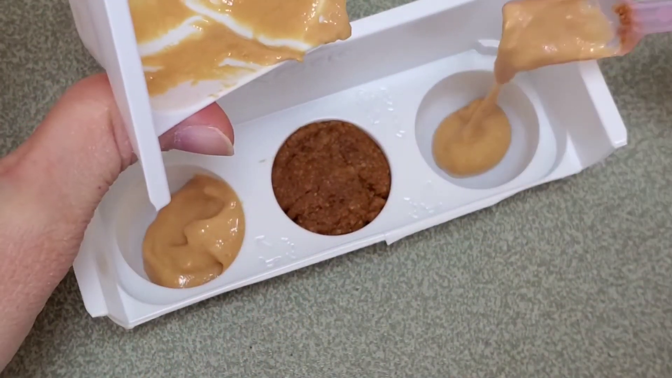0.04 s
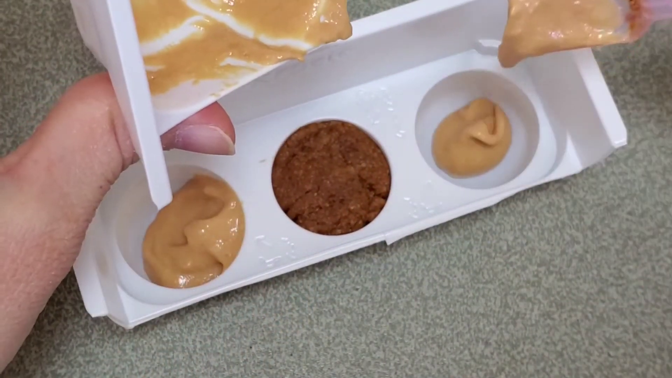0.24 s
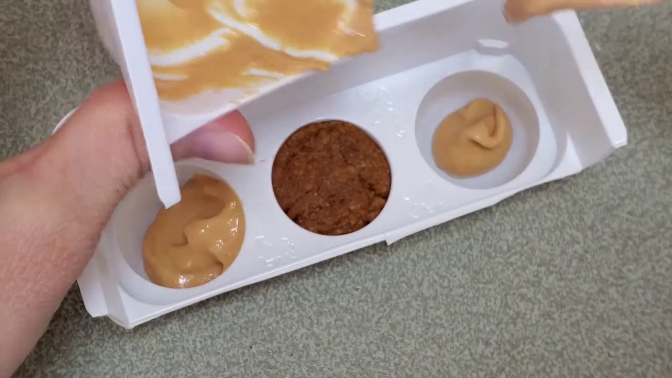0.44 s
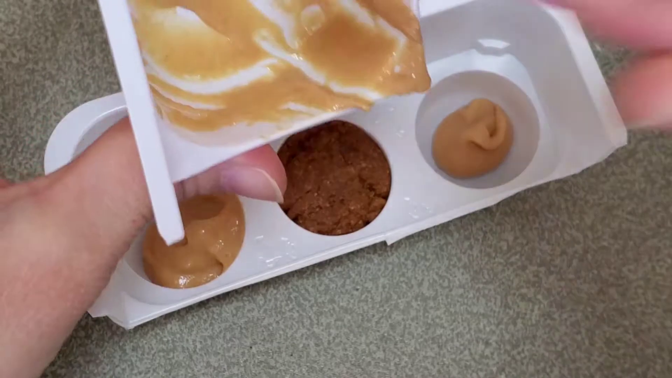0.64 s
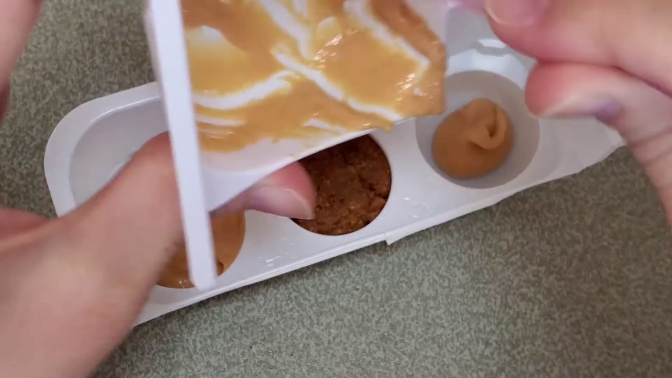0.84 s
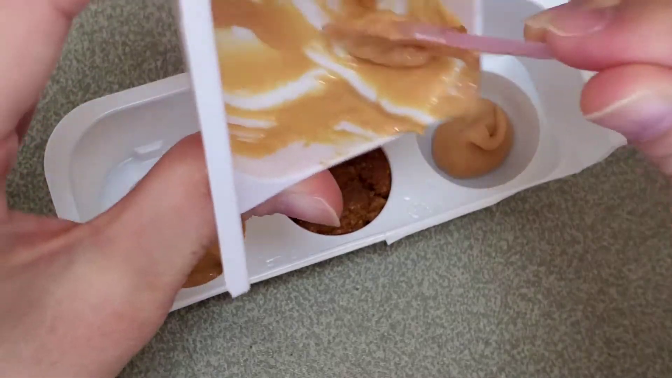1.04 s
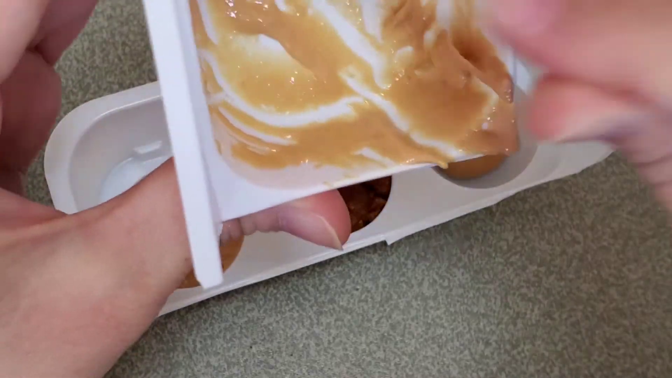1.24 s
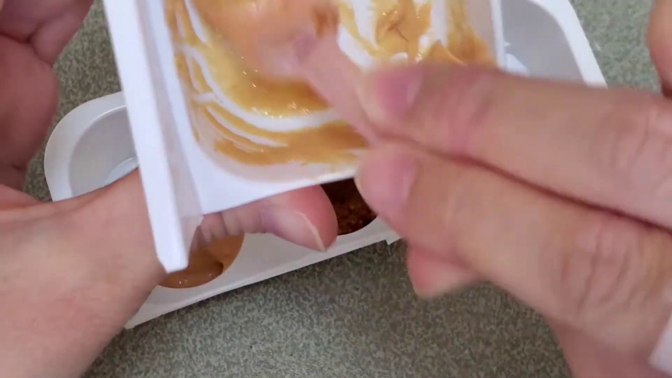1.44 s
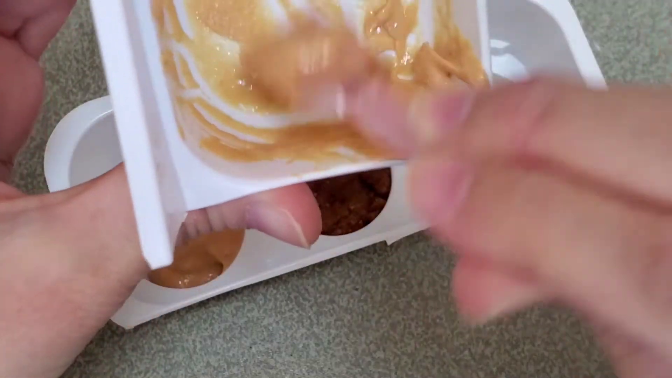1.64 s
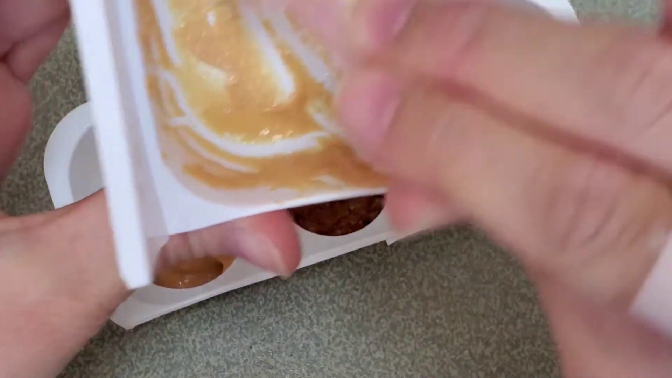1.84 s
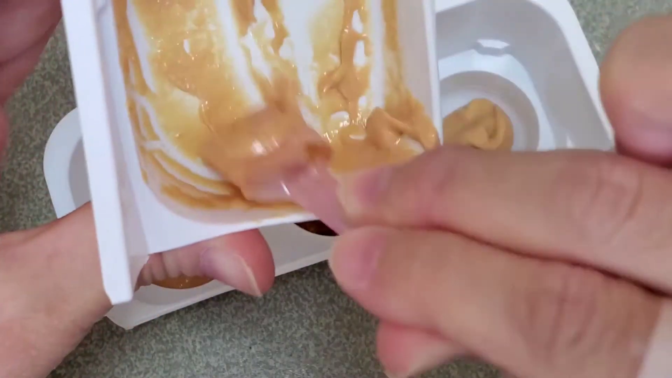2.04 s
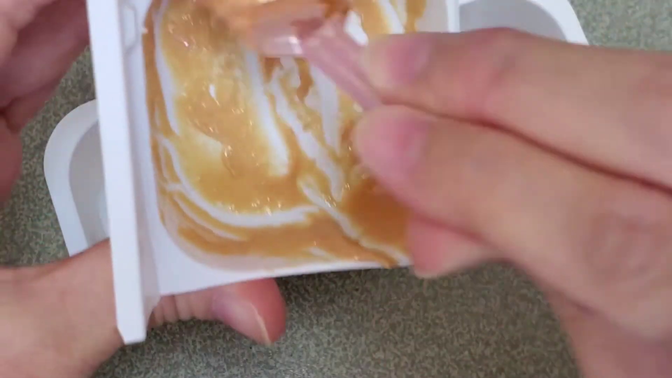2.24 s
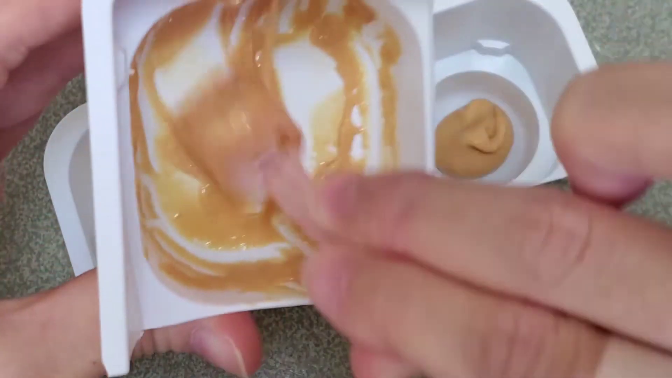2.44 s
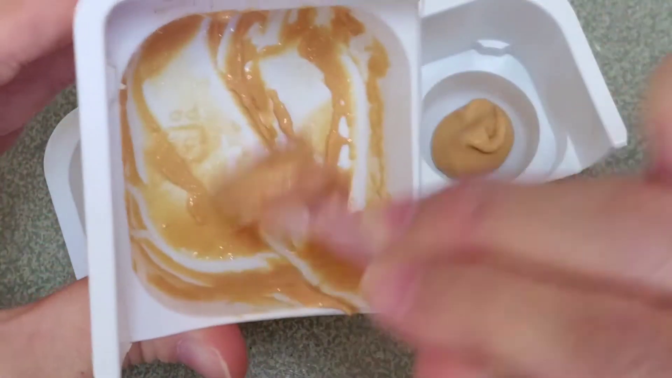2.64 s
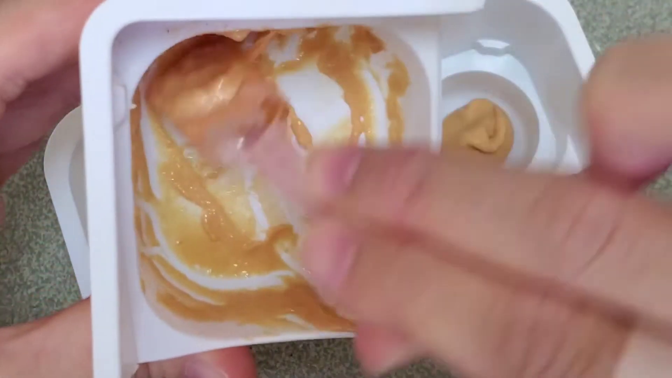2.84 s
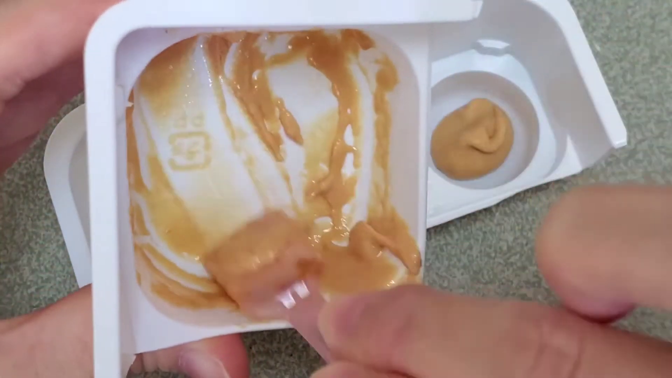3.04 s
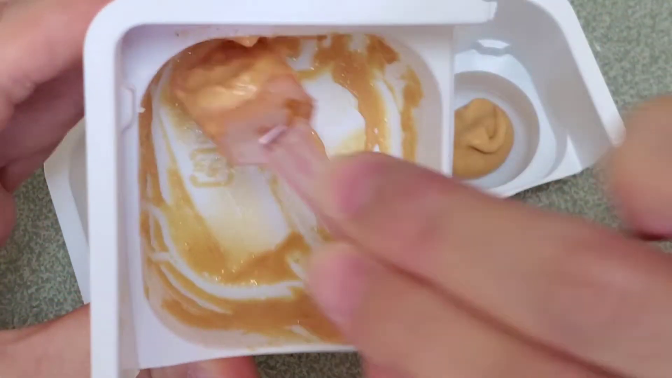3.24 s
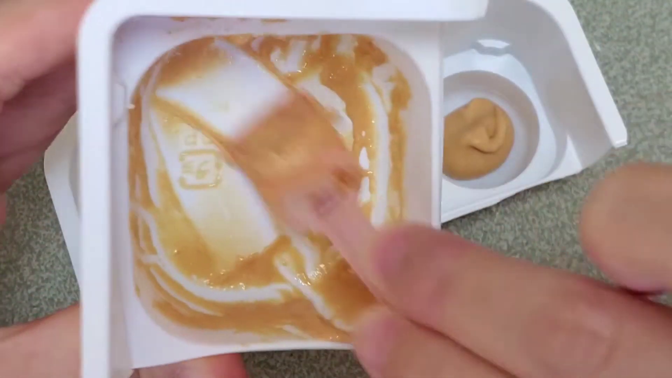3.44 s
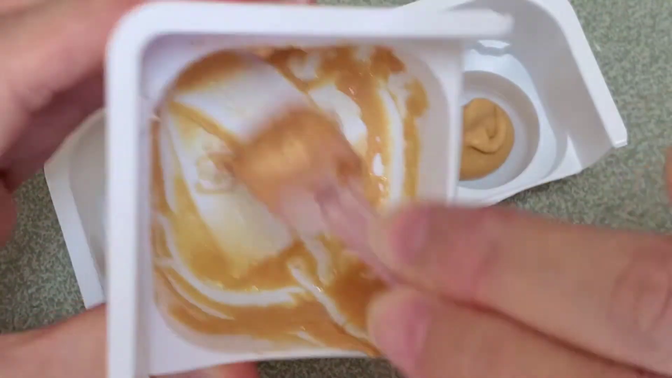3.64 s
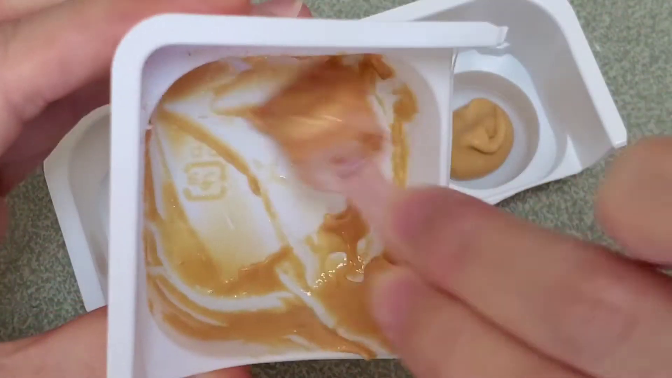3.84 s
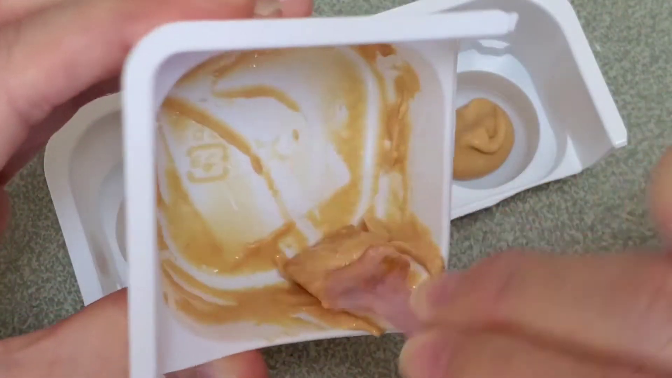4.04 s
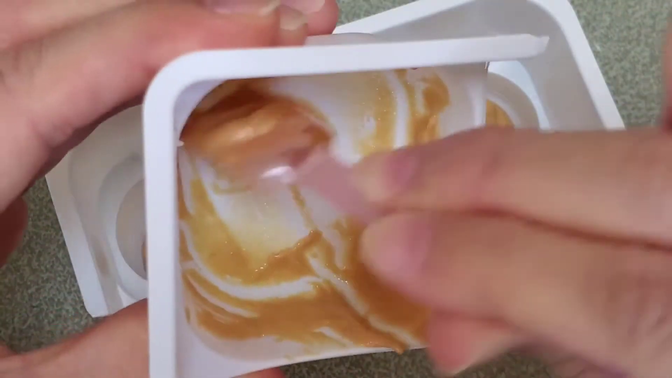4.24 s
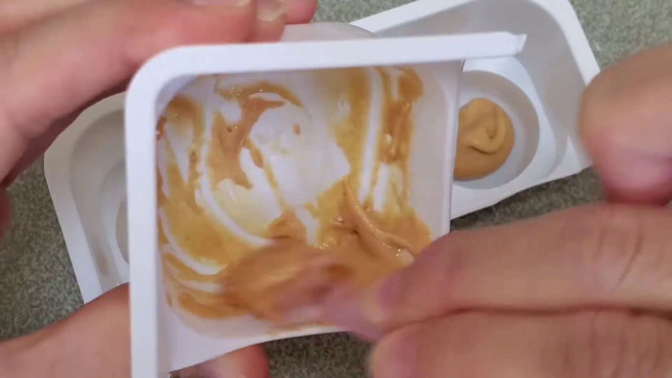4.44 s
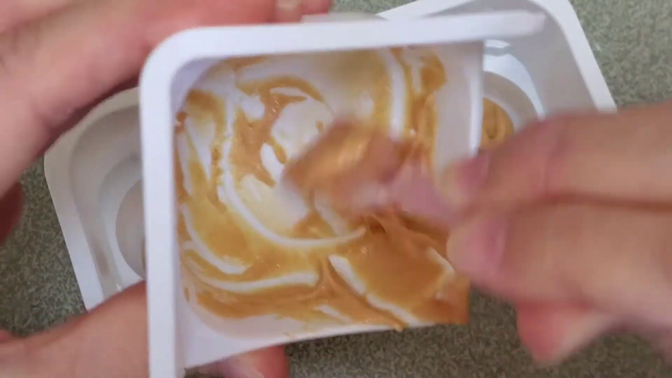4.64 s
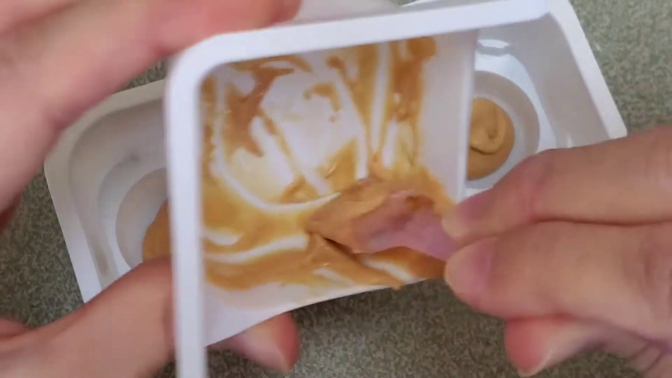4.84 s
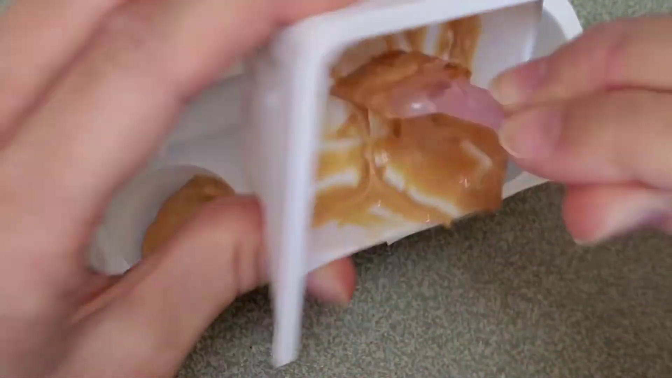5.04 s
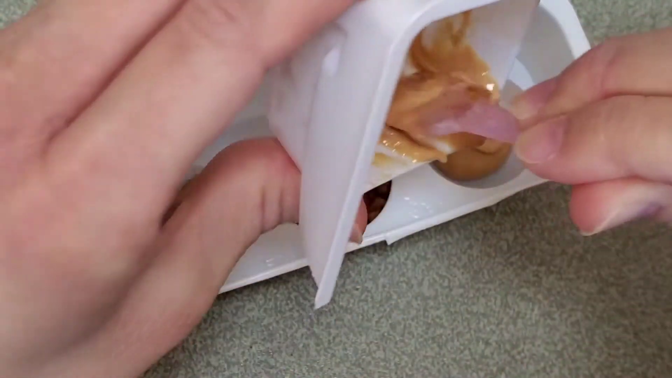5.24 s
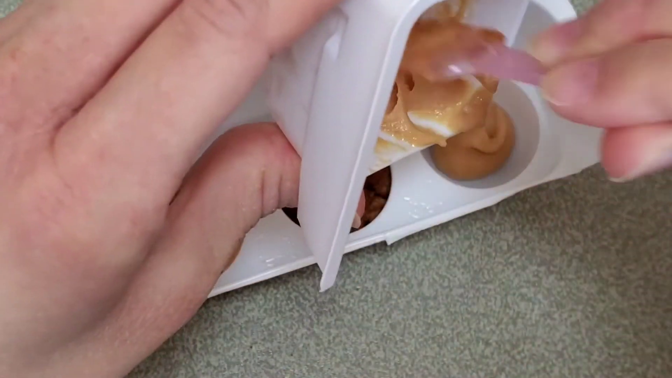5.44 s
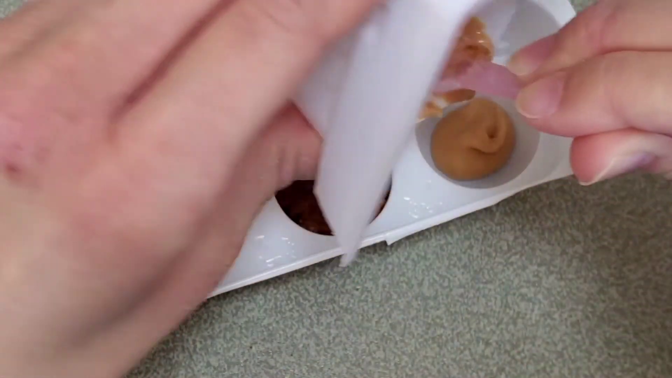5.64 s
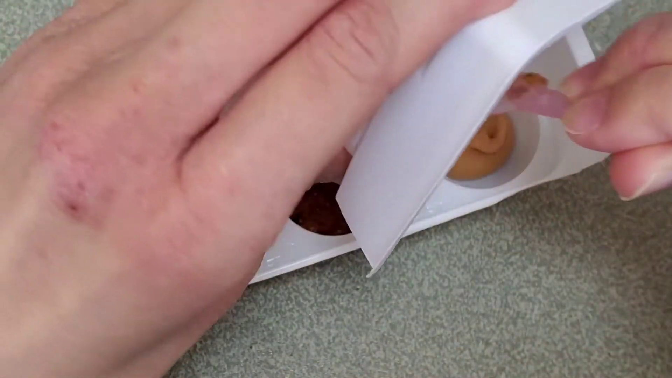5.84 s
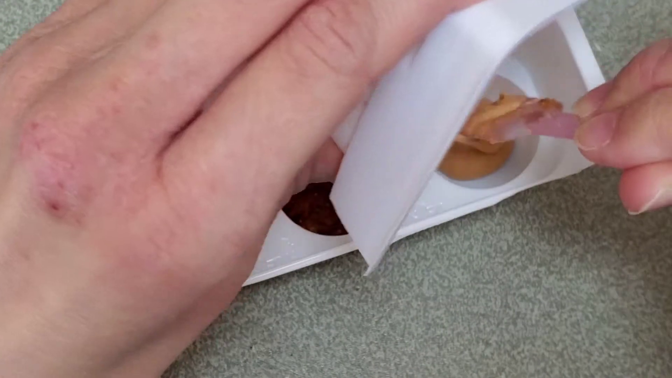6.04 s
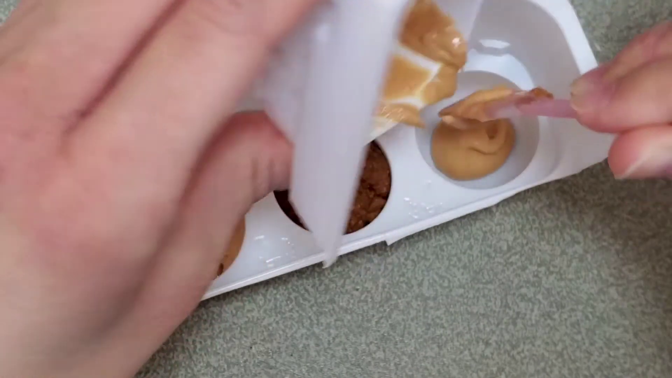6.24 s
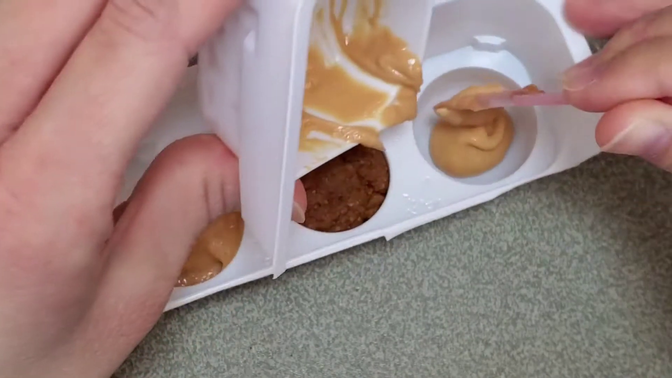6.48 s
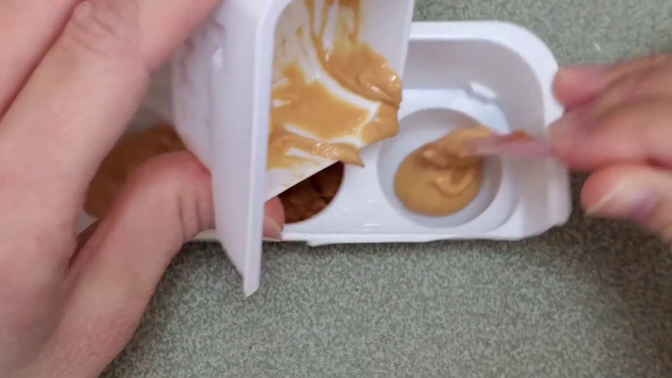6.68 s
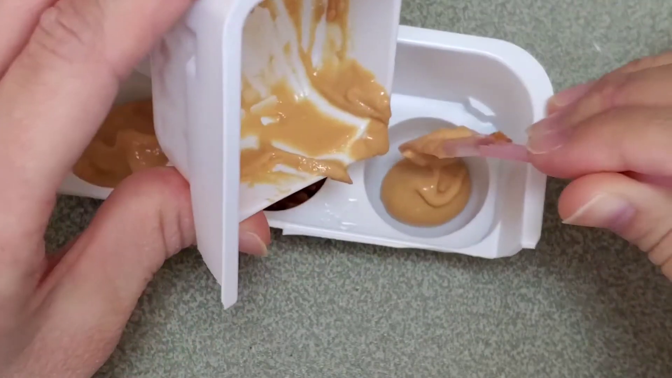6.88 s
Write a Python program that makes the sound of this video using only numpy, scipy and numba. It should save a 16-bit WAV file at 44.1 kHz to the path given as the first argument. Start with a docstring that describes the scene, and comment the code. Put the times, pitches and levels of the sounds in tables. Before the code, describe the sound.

Close stereo sound in a small quiet room with low rumble and soft hiss. After nearly a second, a little plastic spoon scrapes a thin hand-held tray in short swelling strokes, about two a second, with light taps between. A sharp double knock cracks loudly around four and a half seconds. Brief squeaky scrapes follow, then faint wiping on the rim, and finally a soft slide on carpet.

```python
"""Low indoor rumble and hiss come first, then a small plastic spoon scrapes sticky candy paste out of a thin
hand-held plastic tray, close to a stereo microphone in a small room.
Stick-slip grains and tap impulses excite the same tray modes, and one hard knock snaps the wall through.
Late on, the spoon's own modes squeal faintly as it is wiped along the rim; last, the mould underneath
slides a little on the carpet, heard as filtered fibre clicks."""
import sys
import numpy as np
from scipy import signal
from scipy.fft import rfft, irfft, next_fast_len
from scipy.io import wavfile
from scipy.ndimage import map_coordinates
from numba import njit

SR = 44100
rng = np.random.default_rng(int(sys.argv[2]) if len(sys.argv) > 2 else 0)


def unload_wav(signal):
    """Save mono or channel-first audio to the path in sys.argv[1] as 16-bit WAV at rate SR, clipped to [-1, 1]."""
    wavfile.write(
        sys.argv[1],
        SR,
        np.round(np.clip(np.atleast_2d(signal).T, -1, 1) * 32767).astype(np.int16),
    )


N = 304731
TIME = np.arange(N) / SR


def undb(db):
    """Logarithmic level: decibels to amplitude gain."""
    return 10 ** (np.asarray(db) / 20)


def unit(x):
    """Normalisation of power: scale to rms 1."""
    return x / np.sqrt(np.mean(x ** 2))


def curves(rows):
    """Linear interpolation: each column of a table after its times, as a value per sample."""
    s, *columns = np.transpose(rows)
    return [np.interp(TIME, s, column) for column in columns]


def walk(rate):
    """Slow random modulation: normal deviates, `rate` per second, joined by straight lines."""
    knots = rng.standard_normal(int(N / SR * rate) + 2)
    return np.interp(TIME * rate, np.arange(len(knots)), knots)


def colour(x, points):
    """Linear filtering: multiply the spectrum by a response drawn through (f/Hz, level/dB) points."""
    hz, db = np.transpose(points)
    size = next_fast_len(len(x))
    bins = np.maximum(np.arange(size // 2 + 1) * SR / size, 1)
    response = undb(np.interp(np.log(bins), np.log(hz), db))
    return irfft(rfft(x, size) * response, size)[:len(x)]


@njit
def band_pass(x, g, k):
    """State-variable resonator: g = tan(pi f / SR) may move every sample, k = 1 / Q."""
    y, band, low = np.empty(len(x)), 0., 0.
    for i in range(len(x)):
        # the tiny offset keeps the decaying state from becoming denormal
        v = (band + g[i] * (x[i] + 1e-18 - low)) / (1 + g[i] * (g[i] + k))
        band, low, y[i] = 2 * v - band, low + 2 * g[i] * v, k * v
    return y


def ring(x, hz, width, skirt_q=0.98):
    """Damped mode, steady or gliding, scaled by bandwidth; a second resonance steepens its skirts."""
    g = np.tan(np.pi * np.minimum(hz, SR / 3) / SR) * np.ones(N)
    k = np.pi * width / SR * np.mean(g + 1 / g)
    mode = band_pass(x, g, k)
    return band_pass(mode, g, 1 / skirt_q) * np.sqrt(SR / (np.pi * width))


def slips(per_s, spread_db):
    """Stick-slip friction: many tiny releases and a few large ones, of random sign."""
    sizes = undb(spread_db * np.minimum(rng.exponential(size=N), 5))
    released = rng.random(N) < per_s / SR
    return unit(released * sizes * rng.choice([-1, 1], N))


def blows(times, sizes):
    """Impulsive excitation: one single-sample impulse per blow."""
    return np.bincount((np.asarray(times) * SR).astype(int), sizes, N)


def nearest(times):
    """Nearest-neighbour selection: for each sample, the index of the closest event."""
    return np.searchsorted((times[1:] + times[:-1]) / 2, TIME)


def latest(starts):
    """Sample-and-hold selection: for each sample, the index of the event that began last."""
    return np.searchsorted(starts[1:], TIME)


# spectrum of the indoor background before scaling: (f/Hz, level/dB)
BACKGROUND_SPECTRUM = [(12, -46.5), (20, -1.5), (82, 1.5), (111, -7), (135, -3), (199, -3.5), (409, -8.5),
                       (603, -12), (865, -18.5), (1050, -18.5), (1510, -23.5), (7510, -39), (8620, -48),
                       (12400, -33), (15000, -41)]
BACKGROUND_DB = -56.5


def ambience():
    """Coherence: a low rumble alike at both ports, under nearly unrelated microphone hiss."""
    mid, side = (unit(colour(rng.standard_normal(N), BACKGROUND_SPECTRUM)) for _ in range(2))
    # little difference between the ports in the bass, about as much as the common part in the treble
    side = colour(side, [(40, -11), (300, -8.5), (1200, 2), (3000, -1.5), (14000, 0.5)])
    level = undb(BACKGROUND_DB + 1.02 * walk(2.2))
    return level * np.array([mid * undb(-0.24) + side, mid * undb(-0.3) - side])


# reverberation of the small room by band: (f/Hz, t60/s, relative echo level/dB)
ROOM_BANDS = [(196.6, 0.25, -10.5), (600, 0.12, -3.5), (1635, 0.35, -13.5), (2400, 0.23, -7),
              (4300, 0.21, -5), (8100, 0.18, -5), (14130, 0.3, -4)]


def room(x, gap_s=0.0037, early_db=5, early_s=0.0088):
    """Diffuse reverberation: exponentially decaying noise bands, strongest in the first reflections."""
    hz, t60, db = np.transpose(ROOM_BANDS)
    t = TIME[:SR // 2]
    bins = np.log(np.maximum(np.fft.rfftfreq(len(t), 1 / SR), 1))
    onset = np.clip((t - gap_s) / 0.0014, 0, 1) * (1 + undb(early_db) * np.exp(-t / early_s))
    noise = rfft(rng.standard_normal((2, len(t))))
    echo = 0
    # each row of the identity matrix picks one band, crossfaded with its neighbours
    for k, share in enumerate(np.eye(len(hz))):
        fade = onset * np.exp(-np.log(1000) * t / t60[k])
        band = irfft(noise * np.interp(bins, np.log(hz), share), len(t))
        echo = echo + band * fade * undb(db[k]) / np.linalg.norm(fade)
    return signal.fftconvolve(x[None], echo, axes=1)[:, :N]


# place of the spoon: (t/s, lag of the right port/s, left minus right level/dB)
SPOON_PLACE = [(0, 0.00012, -1.8), (3.2, 0.00013, 1), (4.4, .00013, 1), (4.5, 0.00015, 2),
               (4.55, 0.0001, -5.5), (4.9, 0.00013, 2), (5.3, 0.000088, -3), (6, 0.000038, -1),
               (6.9, 0.000093, -2)]
# colour of the left port relative to the right: (f/Hz, level/dB)
PORT_DIFFERENCE = [(200, -8.5), (600, 1), (2400, 0.5), (4100, 4.5), (6000, -5), (8000, 3.5), (11500, 5.5)]


def ports(x):
    """Interaural-like differences: the right port lags, and level and colour differ between the two."""
    lag_s, pan_db = curves(SPOON_PLACE)
    late = map_coordinates(x, [np.arange(N) - lag_s * SR], order=3)
    heard = []
    for sound, side in [(x, .5), (late, -.5)]:  # each port takes half of every difference
        response = [(hz, side * db) for hz, db in PORT_DIFFERENCE]
        heard.append(colour(sound, response) * undb(side * pan_db))
    return np.array(heard)


# the mould shifts and slides on the carpet: (t/s, relative level/dB)
SLIDE_LEVEL = [(6.57, -55.5), (6.672, -78), (6.71, -54.5), (6.746, -54), (6.78, -45), (6.818, -50),
               (6.824, -55.5), (6.91, -52.5)]
# spectrum of the carpet fibres before scaling: (f/Hz, level/dB)
CARPET_SPECTRUM = [(300, -43), (1000, -5), (1450, -2), (1900, 7.5), (3000, -7), (4200, -6.5), (6500, -0.5),
                   (9500, -14), (12500, -8), (15000, -10)]


def sliding():
    """Friction noise: dense random flicks of carpet fibres against the underside of the mould."""
    fibres = unit(colour(slips(per_s=9000, spread_db=3.0), CARPET_SPECTRUM))
    fade_in = np.clip((TIME - SLIDE_LEVEL[0][0]) / 0.017, 0, 1)
    return fibres * undb(curves(SLIDE_LEVEL)[0] + 4.0) * fade_in


GRIP_S, RELEASE_S = 0.0055, 0.006


def stroke(start, length, db, change_db):
    """Force envelope of a short rub: it grips quickly, grows or fades evenly in dB, and lets go."""
    t = TIME[:int((length + .1) * SR)]
    shape = np.minimum(t / GRIP_S, 1) * np.exp(-np.maximum(t - length, 0) / RELEASE_S)
    force = shape * undb(db + change_db * (np.minimum(t / length, 1) - .5))
    return np.pad(force, (int(start * SR), N))[:N]


# spoon wiped along the rim:
# (start t/s, length/s, relative level/dB, change over the wipe/dB, relative level of the high modes/dB)
RIM_WIPES = [(5.309, 0.19, -58, -1, -0.5), (5.674, 0.11, -60, -6.5, 9), (5.786, 0.18, -63.5, 4, 1.5),
             (5.953, 0.073, -56, 0.5, -2)]
# the spoon skips off the rim: (t/s, relative level/dB)
RIM_FLICKS = [(5.9964, -21.5), (5.996, -18), (5.9989, -12.5), (6.0803, -36)]
# modes of the spoon on the rim before the pitch wanders: (f/Hz, width/Hz, relative level/dB)
SPOON_MODES = [(364, 100, -15), (1166, 104, -8.5), (1960, 220, 2), (4120, 300, -1), (5920, 720, -7),
               (7650, 3000, -3.5), (10900, 3000, -13)]
SQUEAL_ABOVE_HZ = 3000


def wiping(level_db=-4.5, flick_bright_db=3, drift=0.019):
    """Friction-driven modes: the spoon squeals faintly along the rim, pitch wandering, and skips off it."""
    grains = undb(level_db + 2.1 * walk(90)) * slips(per_s=2400, spread_db=-3.0)
    s, db = np.transpose(RIM_FLICKS)
    flicks = blows(s, undb(db))
    low, high = flicks, flicks * undb(flick_bright_db)
    for *wipe, bright_db in RIM_WIPES:
        rub = grains * stroke(*wipe)
        low, high = low + rub, high + rub * undb(bright_db)
    pitch = 1 + drift * walk(18)
    out = 0
    for hz, width, db in SPOON_MODES:
        drive = high if hz > SQUEAL_ABOVE_HZ else low
        out = out + undb(db) * ring(drive, hz * pitch, width)
    return out


# crack of the wall snapping through: (f/Hz, width/Hz, relative level/dB)
CRACK_MODES = [(3895, 560, -5.5), (6490, 620, 0), (7840, 1600, -1), (11600, 730, -7)]


def snap(at_s=4.5448, push_db=12, top_hz=420, low_hz=28):
    """Snap-through buckling: the thin wall gives a bright modal crack and one dull push of air."""
    blow = blows([at_s], [1])
    band = signal.butter(2, [low_hz, top_hz], "band", fs=SR, output="sos")
    out = undb(push_db) * signal.sosfilt(band, blow)
    for k, (hz, width, db) in enumerate(CRACK_MODES):
        out = out + (-1) ** k * undb(db) * ring(blow, hz, width)
    return out


# the spoon's edge squeaks on the bare wall:
# (start t/s, length/s, relative level/dB, change over the squeak/dB, centre f/Hz)
WALL_SQUEAKS = [(1.009, 0.021, -37.5, 5, 1570), (4.901, 0.076, -39.5, 7, 1720),
                (5.222, 0.066, -38.5, 2, 1760)]


def squeaking(width_hz=170, drift=0.033, grip_db=1.0):
    """Frictional lock-in: on wiped plastic the judder rings one wavering wall resonance."""
    start, *_, hz = np.transpose(WALL_SQUEAKS)
    rubs = sum(stroke(*rub) for *rub, _ in WALL_SQUEAKS)
    force = rubs * slips(per_s=3000, spread_db=1.5) * undb(grip_db * walk(90))
    return ring(force, hz[latest(start)] * (1 + drift * walk(40)), width_hz, skirt_q=7.5)


# tray modes: (f/Hz at mid-sweep, width/Hz, relative level/dB, rise/octaves as the spoon crosses the tray)
TRAY_MODES = [(697, 130, -13, 0.63), (1100, 240, -4, 0.31), (1511, 360, -6.5, 0.24), (1806, 300, -3, 0.12),
              (2870, 850, -7.5, 0.5), (3772, 430, -3.5, 1.74), (4964, 1400, -1, 0.13),
              (7700, 820, -15, 0.18), (11360, 2100, -7.5, 0)]
BOTTOM_BELOW_HZ, EDGE_ABOVE_HZ = 1300, 2400


def tray(force, bottom, edge, tilt_db, waver_db):
    """Modal superposition: bottom flex drives low modes, a biting edge high ones; the corner is stiffer."""
    place, out = travel(), 0
    for k, (hz, width, db, rise) in enumerate(TRAY_MODES):
        if hz > EDGE_ABOVE_HZ:
            # treble tilt in dB per octave, about the third mode from the top
            drive = edge * undb(tilt_db * np.log2(hz / TRAY_MODES[-3][0]))
        else:
            drive = bottom if hz < BOTTOM_BELOW_HZ else force
        # the contact point wanders over each mode's nodes and crests
        drive = drive * undb(db + waver_db * walk(45))
        out = out + (-1) ** k * ring(drive, hz * 2 ** (rise * place), width)
    return out


# spoon knocks on the tray, each played push_s later:
# (t/s, relative wall level/dB, flex/dB, bite/dB, panel f/Hz, panel level/dB)
TRAY_TAPS = [(0.898, -49.5, -11, -8, 366, -5.5), (1.441, -55, -26, -7, 423, -15),
             (1.581, -38, -20, -11.5, 593, -20), (1.633, -48.5, -24, -9, 445, 6),
             (1.976, -39.5, -23, -12.5, 476, -38), (2.178, -49, 10, -12, 590, -22),
             (2.419, -43, -18, -29, 606, -41), (2.674, -38.5, 7.5, -7, 620, -18),
             (2.915, -54.5, 2, -26, 730, -4.5), (2.924, -44.5, -15, -15, 570, -38),
             (2.997, -41.5, -18, -13, 557, -39), (3.175, -34.5, -5, -22, 610, -18.5),
             (3.454, -38, -13, -9, 450, -24), (3.66, -39.5, 3, -9, 447, -22),
             (3.877, -44, -15, -22, 440, -27), (3.931, -39.5, -20, -9, 452, -24),
             (4.003, -40.5, -30, -16, 522, -24), (4.109, -40, -7, -18, 660, -16),
             (4.147, -36.5, -29, -11.5, 444, -37), (4.405, -32.5, -26.5, -20, 490, -11.5),
             (4.446, -49, -14.5, -13, 507, -7.5), (4.501, -14, -13, -28.5, 617, -18.5),
             (4.543, -13, -13.5, -11, 613, -23), (4.756, -67.5, -18.5, 1, 500, -28),
             (4.86, -35, -20.5, -31, 515, -18.5), (5.223, -38.5, -13, -37, 540, -12),
             (6.081, -53.5, -2, -8.5, 427, 0), (6.552, -40.5, -17.5, -12.5, 512, -7)]


def tapping(level_db=26, panel_width_hz=85, push_s=0.001206, scuff_s=0.0039, scuff_db=-31,
            bottom_db=4.0, edge_db=0.0, boom_db=6.0):
    """Impulse response: each knock rings the tray and the panel, whose pitch depends on where it is hit."""
    s, wall_db, flex_db, bite_db, panel_hz, panel_db = np.transpose(TRAY_TAPS)
    s = s + push_s
    size, which = undb(wall_db + level_db), nearest(s)
    # the spoon lands at a slant and scuffs for a moment around each blow
    scuff_shape = np.exp(-np.abs(TIME - s[which]) / scuff_s)
    scuff = size[which] * undb(scuff_db) * scuff_shape * rng.standard_normal(N)
    force = blows(s, size) + scuff
    bottom = force * undb(flex_db + bottom_db)[which]
    edge = force * undb(bite_db + edge_db)[which]
    out = tray(force, bottom, edge, tilt_db=-2.6, waver_db=1.64)
    for at, hz, gain in zip(s, panel_hz, size * undb(panel_db + boom_db)):
        out = out + ring(blows([at], [gain]), hz, panel_width_hz)
    return out


def judder(per_s=4500, spread_db=2.0, grip_db=2.5):
    """Stick-slip of the spoon in the paste, modulated by a wavering grip."""
    return slips(per_s, spread_db) * undb(grip_db * walk(170))


# short drags of the spoon: (start t/s, length/s, relative pressure level/dB, change over the drag/dB,
# flex/dB, bite/dB, treble tilt/dB per octave)
SPOON_DRAGS = [(0.89, 0.029, -49.5, 1, -3, -2.5, -3), (0.995, 0.037, -41, 7, -15, -2, -2.5),
               (1.108, 0.12, -58.5, -7, -11.5, -6.5, -3), (1.434, 0.19, -66, 15, -4, -2.5, 2.5),
               (1.961, 0.034, -47.5, 0.5, -10, -15, 3), (1.996, 0.096, -66, 6, -3, -0.5, 0),
               (2.191, 0.007, -39.5, 4, -3, -2.5, -0.5), (2.411, 0.1, -50.5, 5, -6.5, -12, 0),
               (2.542, 0.04, -61.5, 2, -7, 0.5, -4), (2.705, 0.018, -37.5, -5, -10.5, -10.5, 1),
               (2.921, 0.12, -50, -5, -11, -12, 2), (2.991, 0.011, -41, -2, -8, -11, 1),
               (3.395, 0.049, -50, 7, -8.5, -12, 1), (3.448, 0.014, -42.5, 1, -10, -17, 7.5),
               (3.488, 0.073, -67, 1, 4, 7, 1), (3.706, 0.063, -56, -10, -18, -21, 4),
               (3.868, 0.071, -51, 8, -11, -10.5, 1.5), (3.925, 0.014, -41.5, 4, -11, -12, 2.5),
               (3.963, 0.064, -47.5, -4, -3, -2, 1.5), (4.142, 0.028, -35, -13, -21, -16, 5.5),
               (4.401, 0.053, -55.5, -13, -6.5, -2, 1.5), (4.456, 0.05, -40.5, 1, -7.5, -6, -4),
               (4.514, 0.022, -53.5, -1, 4.5, -21, -10), (4.557, 0.15, -52.5, -13.5, -6, -7, 2.5),
               (4.902, 0.067, -43.5, -2, -10.5, -3.5, -1.5), (5.218, 0.074, -45, 0.5, -13.5, -4.5, -2.5)]


def dragging(level_db=2):
    """Friction excitation of modes: the spoon is set down, drawn back and scraped against the wall."""
    wall = bottom = edge = 0
    for *rub, flex_db, bite_db, _ in SPOON_DRAGS:
        force = stroke(*rub)
        wall = wall + force
        bottom = bottom + force * undb(flex_db)
        edge = edge + force * undb(bite_db)
    start, *_, tilt_db = np.transpose(SPOON_DRAGS)
    grains = judder(per_s=4900, spread_db=2.5, grip_db=3.0) * undb(level_db)
    return tray(grains * wall, grains * bottom, grains * edge, tilt_db[latest(start)], waver_db=2.64)


# the spoon hops off the floor in the corner: (t/s, half length/s)
CORNER_HOPS = [(2.187, 0.007), (2.69, 0.0086)]


def grounded(depth_db=-16):
    """Loss of contact: gain 1 while the spoon touches, with a bell-shaped dip in dB at each hop."""
    return undb(depth_db * sum(np.exp(-((TIME - s) / half) ** 2) for s, half in CORNER_HOPS))


def hollow(force, open_hz=5450, closed_hz=3870, width_hz=480, swell_db=11):
    """Cavity resonance: as the hollow between spoon and wall closes up, its pitch sinks and it strengthens."""
    gap = np.sqrt(.5 - travel())
    return ring(force * undb(-swell_db * gap), closed_hz * (open_hz / closed_hz) ** gap, width_hz)


# long sweeps across the bottom into the far corner: (start t/s, length/s, relative peak pressure level/dB,
# swell up to that peak/dB, flex of the bottom/dB, bite of the edge/dB, hollow level/dB, panel level/dB)
LONG_SWEEPS = [(0.93, 0.123, -39.5, 14, -13, -6, 5.5, -34), (1.589, 0.13, -40.5, 11.5, -2, -5.5, 6.5, -15),
               (2.085, 0.12, -36.5, 17, -3, -10.5, 7.5, -17.5), (2.583, 0.1, -37.5, 17, -6.5, -8, 7, -23),
               (3.064, 0.15, -38.5, 14.5, -4, -9, 8.5, -17.5), (3.554, 0.15, -39.5, 15, 1, -6, 4.5, -26),
               (4.029, 0.13, -41.5, 8, -6, -8, 7, -23)]


def travel(rest_s=.05, return_s=0.046):
    """Kinematics of a sweep: -1/2 at the near side, 1/2 in the far corner, 0 between sweeps."""
    path = []
    for start, length, *_ in LONG_SWEEPS:
        end = start + length
        path += [(start - return_s, 0), (start, -.5), (end, .5)]
        path += [(end + rest_s, .5), (end + rest_s + return_s, 0)]
    return curves(path)[0]


# every sweep presses hardest at the same share of its way, then eases off
HARDEST_SHARE, SWELL_POWER, EASE_S, EASE_DB, EASE_POWER = 0.82, 1.35, 0.038, 14, 1.6
# the bottom gives most under the hardest push; the edge bites most as the spoon sets off
FLEX_FALL_DB, EARLY_BITE_DB = 3.5, 4
# the panel under the spoon starts slack and booming, and tightens on the way
PANEL_HZ, PANEL_RISE_OCTAVES, PANEL_WIDTH_HZ, EARLY_PANEL_DB = 495, 0.61, 89, 11


def sweeping(level_db=2):
    """Pressure-controlled friction: each sweep swells as paste is pushed to the corner, then eases off."""
    rows = np.array(LONG_SWEEPS)
    sweep = rows[latest(rows[:, 0])].T
    start, length, peak_db, swell_db, flex_db, bite_db, hollow_db, panel_db = sweep
    age, hardest = TIME - start, HARDEST_SHARE * length
    ahead = np.clip(1 - age / hardest, 0, 1)
    past = np.clip((age - hardest) / EASE_S, 0, 10)
    pressure_db = level_db + peak_db - swell_db * ahead ** SWELL_POWER - EASE_DB * past ** EASE_POWER
    force = judder() * grounded() * np.clip(age / GRIP_S, 0, 1) * undb(pressure_db)
    bottom = force * undb(flex_db - FLEX_FALL_DB * (ahead + past))
    edge = force * undb(bite_db + EARLY_BITE_DB * ahead)
    panel_hz = PANEL_HZ * 2 ** (PANEL_RISE_OCTAVES * travel())
    panel = ring(force * undb(panel_db + EARLY_PANEL_DB * ahead), panel_hz, PANEL_WIDTH_HZ)
    return tray(force, bottom, edge, tilt_db=2.3, waver_db=2.4) + hollow(edge * undb(hollow_db)) + panel


def scene(tap_echo_db=-2, scrape_echo_db=0.0, rim_echo_db=-4, snap_echo_db=-5):
    """Direct and reverberant fields: what faces the microphone sends less sound into the room."""
    scrapes = sweeping() + dragging() + squeaking() + sliding()
    sources = [(tapping(), tap_echo_db), (scrapes, scrape_echo_db),
               (wiping(), rim_echo_db), (snap(), snap_echo_db)]
    direct = sum(sound for sound, _ in sources)
    spread = sum(sound * undb(echo_db) for sound, echo_db in sources)
    return ports(direct) + room(spread) + ambience()


TOP_HZ = 14700


def record(dry):
    """Band-limiting: the recorder clips at full scale, then a steep low-pass cuts the top."""
    low_pass = signal.ellip(12, .2, 95, TOP_HZ, fs=SR, output="sos")
    return signal.sosfilt(low_pass, np.clip(dry, -1, 1))


dry = scene()
out = record(dry)
unload_wav(out)
```